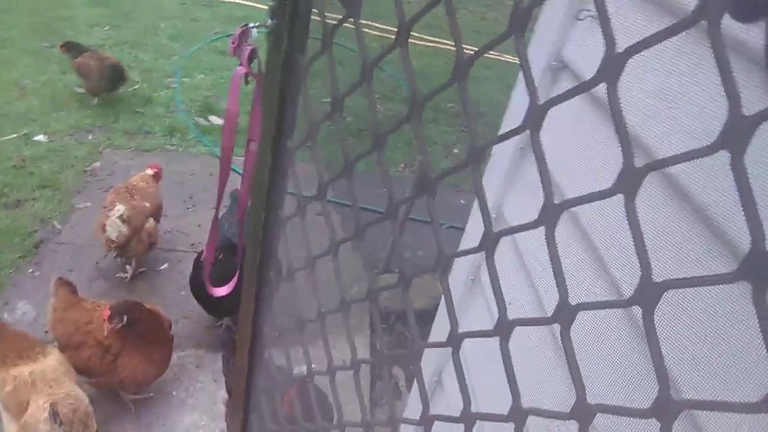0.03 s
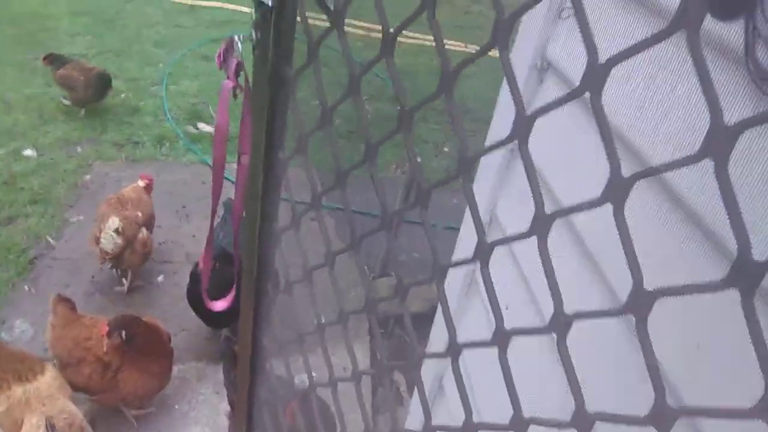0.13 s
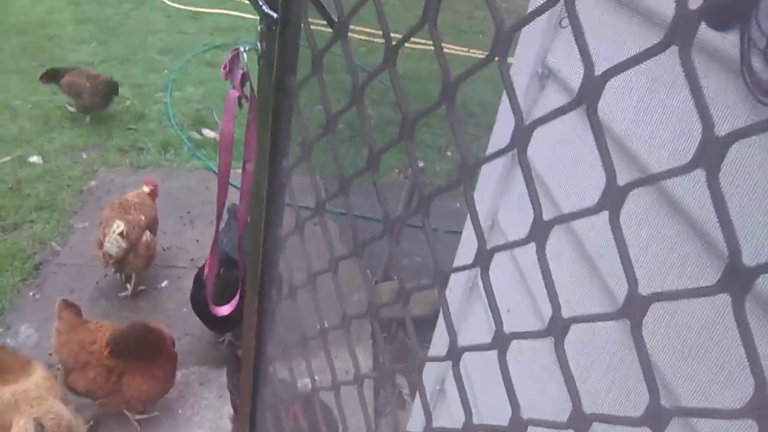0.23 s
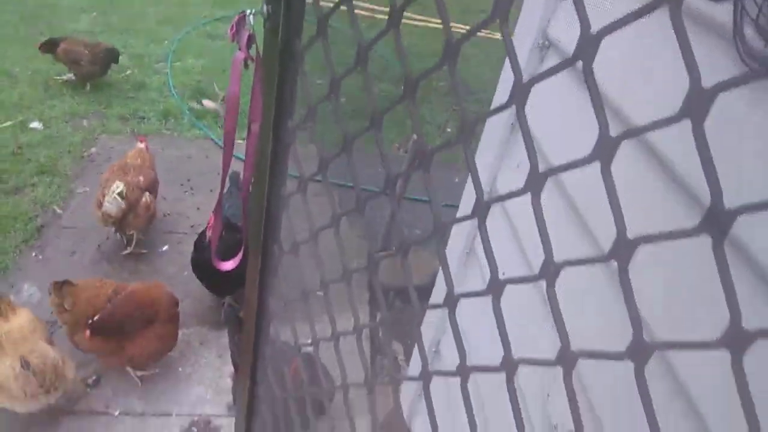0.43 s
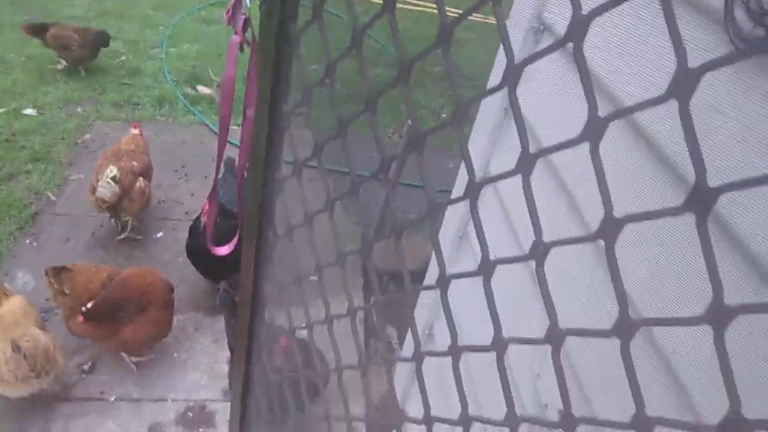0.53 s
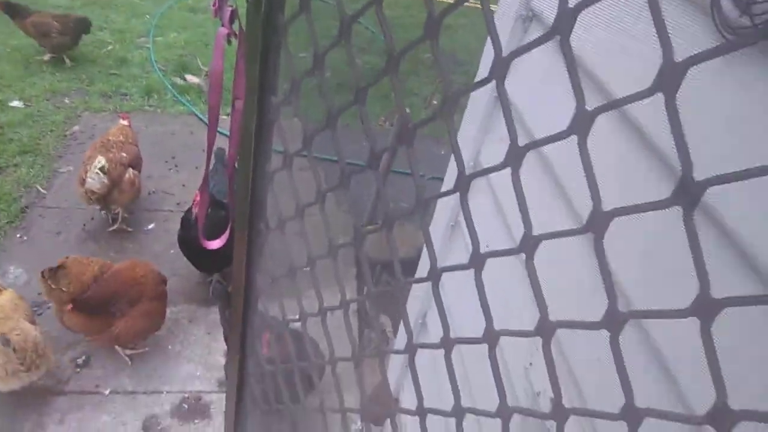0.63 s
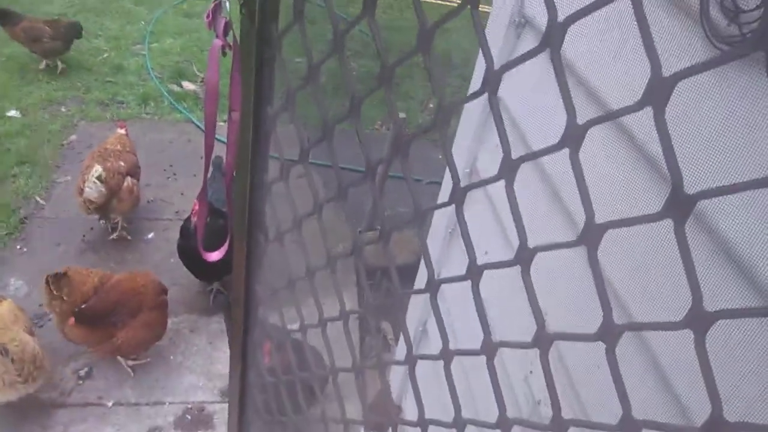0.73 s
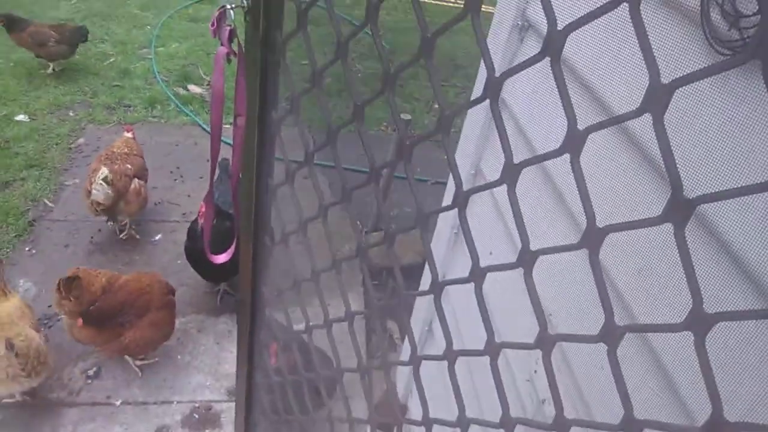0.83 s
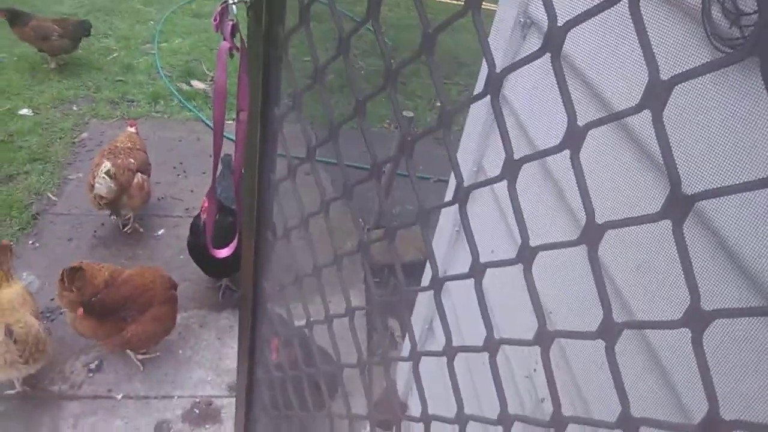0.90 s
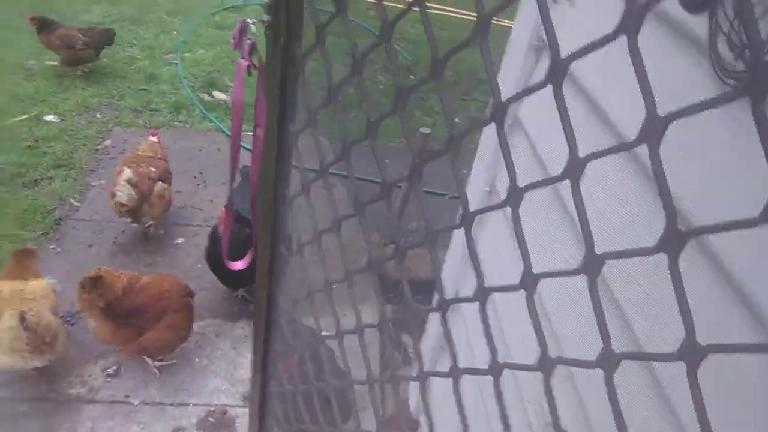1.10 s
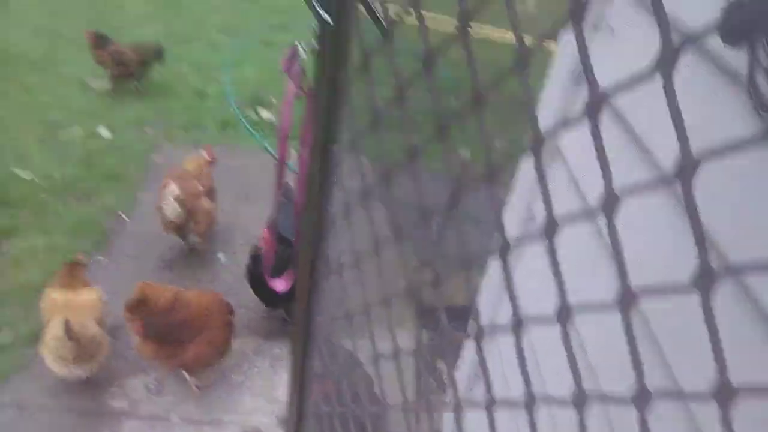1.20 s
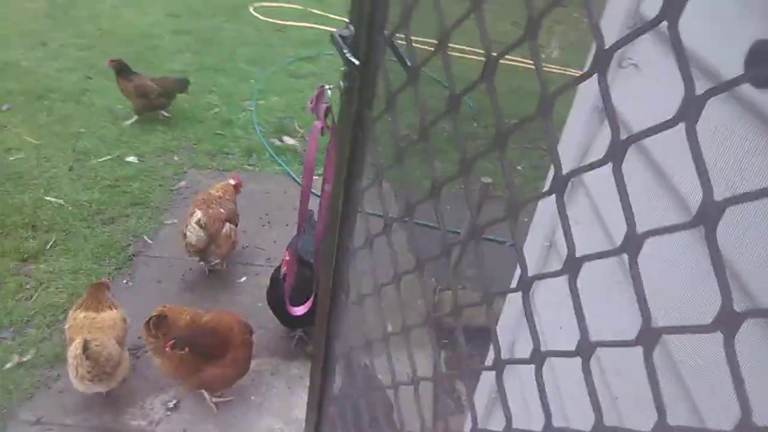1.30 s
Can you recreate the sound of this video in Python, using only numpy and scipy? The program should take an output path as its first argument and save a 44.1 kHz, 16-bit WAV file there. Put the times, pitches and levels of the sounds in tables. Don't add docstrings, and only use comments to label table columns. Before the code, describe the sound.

Chicken clucks, short and reedy, with loud dull door thuds and a latch click nearby.

```python
import sys
import numpy as np
from scipy import signal
from scipy.fft import rfft, irfft
from scipy.io import wavfile
from scipy.ndimage import uniform_filter1d

SR = 44100
rng = np.random.default_rng(int(sys.argv[2]) if len(sys.argv) > 2 else 0)


def decibels_to_gain(level_db):
    exponent = np.asarray(level_db, float) / 20
    return 10 ** exponent


def generate_wav(signal):
    frames = np.transpose(np.atleast_2d(signal))
    scaled = np.clip(frames, -1, 1) * 32767
    pcm = np.round(scaled).astype(np.int16)
    wavfile.write(sys.argv[1], SR, pcm)


N = 59535
T = np.arange(N) / SR
MIC_LOW_HZ = 115

# extra pitch at first as a share, time to lose it in s, attack in s.
GENTLE_ONSET = (0.11, .006, 0.002)


def colour(points, hz):
    p = np.array(points, float)
    return decibels_to_gain(np.interp(np.log(np.maximum(hz, 1)), np.log(p[:, 0]), p[:, 1]))


def walk(rate, size=N):
    k = int(SR / rate)
    w = rng.standard_normal(size + 4 * k)
    w = uniform_filter1d(uniform_filter1d(w, k), k)
    return w[:size] / w.std()


def lowpass(x, hz):
    return signal.sosfilt(signal.butter(2, np.clip(hz, 20, SR / 3), fs=SR, output="sos"), x)


def highpass(x, hz, order):
    return signal.sosfilt(signal.butter(order, hz, "high", fs=SR, output="sos"), x)


def bandpass(x, low_hz, high_hz, order):
    return signal.sosfilt(signal.butter(order, [low_hz, high_hz], "band", fs=SR, output="sos"), x)


def air():
    # pitch in Hz, level in dB.
    air_colour = [(30, -5.5), (470, -7), (1200, -9), (1700, -13), (3700, -21.5), (4200, -29), (8000, -31.5),
                  (14000, -32.5)]
    spectrum = rfft(rng.standard_normal(N)) * colour(air_colour, np.fft.rfftfreq(N, 1 / SR))
    noise = irfft(spectrum, N)
    level_db = -72 + 0.13 * walk(3.8)
    return decibels_to_gain(level_db) * noise / noise.std()


def scuffs():
    # peak in seconds, level in dB, rise in s, decay in s, centre in Hz.
    scrapes = [(0.019, -70, 0.028, 0.11, 7800), (0.076, -59.5, .012, 0.039, 5800),
               (0.101, -70.5, .008, 0.11, 5100), (.2385, -50.5, 0.00053, 0.0057, 4300),
               (0.261, -68, .01, 0.084, 4880), (0.409, -59, 0.0013, 0.0026, 5360),
               (0.4164, -59.5, 0.001, 0.005, 5300), (0.417, -73.5, .002, 0.053, 5400),
               (0.083, -68.5, 0.036, 0.04, 10200), (0.408, -73.5, 0.012, 0.044, 9700),
               (0.406, -58, 0.0041, 0.017, 1480), (0.774, -79, .001, 0.005, 4700),
               (1.006, -83, .002, 0.005, 5940), (0.58, -66, .015, .04, 1370),
               (0.54, -71.5, 0.025, 0.044, 1840), (0.921, -77, .02, 0.066, 5000)]
    out = 0
    for start, db, rise, decay, hz in scrapes:
        grit = rng.standard_normal(N) * decibels_to_gain(3.2 * walk(250))
        hiss = bandpass(grit, hz / 1.67, min(hz * 1.217, SR / 3), 2)
        log_shape = np.where(T < start, -((T - start) / rise) ** 2, (start - T) / decay)
        out = out + decibels_to_gain(db) * hiss / hiss.std() * np.exp(log_shape)
    return out


def strike(start, db, contact_ms, modes, scatter_db):
    u = np.arange(int(SR / 4)) / SR
    chance = rng.standard_normal((len(modes), 2))
    ring = 0
    for k, ((hz, mode_db, t60), (louder, sharper)) in enumerate(zip(modes, chance)):
        gain = (-1) ** k * decibels_to_gain(mode_db + scatter_db * louder)
        wave = np.sin(2 * np.pi * hz * (1 + 0.023 * sharper) * u)
        ring = ring + gain * wave * 1000. ** (-u / t60)
    push = np.sin(np.pi * np.clip(u[:600] * 1000 / contact_ms, 0, 1)) ** 2
    ring = signal.fftconvolve(ring, push)[:len(u)]
    out, i = np.zeros(N + len(u)), int(start * SR)
    out[i:i + len(u)] = ring * decibels_to_gain(db) / np.abs(ring).max()
    return out[:N]


def frame_sway():
    # start in seconds, level in dB, pitch in Hz, time to fade by 60 dB in s.
    sways = [
        (0.354, -46, 108, 0.13),
        (0.636, -66, 103.2, 0.23),
        (0.93, -58.5, 93.3, 0.28),
        (1.07, -62.5, 99, 0.22),
        (1.1, -64.5, 102, .12),
        (1.177, -68, 149.6, 0.3),
    ]
    sway = sum(strike(s, db, 2, [(hz, 0, t60)], 0) for s, db, hz, t60 in sways)
    return highpass(sway, MIC_LOW_HZ / 2, 2)


def frame_thuds():
    # start in seconds, level in dB, contact in ms, panel pitch in Hz.
    thuds = [(0.302, -40.5, 0.61, 330), (0.313, -38.5, 2.2, 200), (.328, -24, 1.25, 290),
             (0.34, -31.5, 2.4, 210), (0.348, -52, 0.73, 380), (.358, -33.5, 1.46, 190),
             (.381, -51, 2.3, 190), (0.393, -45.5, 1.5, 330), (0.4016, -21.5, 1.5, 313),
             (0.4045, -15, 1.38, 204), (0.4132, -17, 0.78, 340), (.422, -23.5, 1.2, 300),
             (.4335, -26.5, 1.04, 420), (.447, -39.5, 1.9, 410), (.460, -48, 1.1, 390),
             (.475, -38, 0.82, 430), (0.488, -40, 1.34, 380), (0.5161, -32, 1.62, 290),
             (0.5216, -31, 1.8, 270), (.545, -45, 1.1, 400), (0.561, -55, 2.9, 190), (.769, -38, 2.5, 230),
             (.778, -40, 2, 200), (0.7846, -38.5, 2.1, 260), (0.79, -40.5, 1.45, 400),
             (.7945, -35, 1.84, 169.4), (.801, -48.5, 0.94, 260)]
    # pitch in Hz, level in dB, time to fade by 60 dB in s.
    frame = [(101.6, -19, .07), (163.7, -9, .05), (186, -10, 0.043), (428.5, -13.5, .12),
             (546, -28.5, 0.036), (998, -23.5, 0.064)]
    panel_db, panel_t60_s = 4, 0.02
    return sum(strike(s, db, ms, [(hz, panel_db, panel_t60_s), *frame], 1) for s, db, ms, hz in thuds)


def latch():
    # pitch in Hz, level in dB, time to fade by 60 dB in s.
    latch_modes = [(200, -5.5, 0.056), (428, 0, 0.1), (542, -34.5, 0.11), (775, -14.5, 0.19),
                   (982, 0, 0.15), (1203, -7, 0.091), (1687, -1, .055), (1970, -5, 0.028),
                   (2390, -9.5, 0.038), (3320, -20, .03), (4640, -16, 0.015)]
    start_s, level_db = .2378, -25
    first = strike(start_s, level_db, 0.08, latch_modes, 0)
    return first + strike(start_s + 0.003466, level_db - 4, 0.18, latch_modes, 4.0)


def peck():
    # pitch in Hz, level in dB, time to fade by 60 dB in s.
    board_modes = [(290, 2.5, 0.027), (441, -10, 0.068), (685, -8.5, 0.083), (970, -13.5, 0.087),
                   (1178, -12, .043), (1697, -13.5, 0.12), (2100, -8, 0.024), (2254, -13.5, 0.029)]
    return strike(.9175, -29, 0.17, board_modes, 0)


def syrinx(hz, half_db, throat, breath_db):
    n, raspy = len(hz), breath_db > -42
    wobble, rasp_db = (.008, 2.8) if raspy else (0.0015, .5)
    phase = np.pi * np.cumsum(hz * (1 + wobble * walk(120, size=n))) / SR
    turn = 2 * np.pi * rng.random(15)
    tone = 0
    for k in range(1, 15):
        level = colour(throat, k * hz / 2) * (decibels_to_gain(half_db) if k % 2 else 1)
        flutter = decibels_to_gain(rasp_db * walk(450, size=n))
        tone = tone + np.sin(k * phase + turn[k]) * level * flutter
    breath = bandpass(rng.standard_normal(n), 2500, 7500, 3)
    return tone + decibels_to_gain(breath_db) * breath


RELEASE_S = .0055


def note(start, length, hz, db, half_db, throat, onset, breath_db=-34, swell_db=3):
    u = T[:SR // 10]
    drop, drop_s, attack = onset
    sag = 0.22 * np.clip(u - length, -length, length)
    pitch = hz * (1 + drop * np.exp(-u / drop_s) - sag)
    opening = np.sin(np.pi / 2 * np.clip(u / attack, 0, 1)) ** 2
    swell = decibels_to_gain(swell_db * (np.minimum(u / length, 1) - 1) - 3)
    shut = .5 - .5 * np.tanh((u - length) / RELEASE_S * 2)
    voice = decibels_to_gain(db) * np.sqrt(2) * opening * swell * shut * syrinx(pitch, half_db, throat, breath_db)
    return np.r_[np.zeros(max(int(start * SR), 0)), voice, np.zeros(N)][:N]


def far_murmurs():
    # start in seconds, length in s, pitch in Hz, level in dB.
    murmurs = [(.183, 0.011, 386, -66.5), (0.967, 0.045, 359.6, -66), (0.283, 0.052, 361.3, -62),
               (0.516, 0.026, 395, -63), (0.569, 0.016, 407.6, -57.5), (1.015, 0.013, 399, -69),
               (1.03, 0.016, 397, -73), (1.051, 0.014, 415, -72), (1.078, 0.017, 407, -76.5),
               (1.106, 0.023, 406, -76.5), (1.129, 0.017, 417, -76), (1.169, 0.018, 412, -77),
               (1.189, 0.022, 363.4, -73), (1.209, 0.021, 387, -78), (1.232, 0.0094, 398, -79),
               (1.256, 0.021, 331.6, -77.5)]
    # pitch in Hz, level in dB.
    far_throat = [(400, -29), (800, -14.5), (1200, 12), (1620, -16.5), (2100, -6), (3000, -32)]
    return sum(note(*row, -19, far_throat, GENTLE_ONSET) for row in murmurs)


def fading_notes():
    # start in seconds, length in s, pitch in Hz, level in dB.
    fading = [
        (0, 0.026, 681.5, -55),
        (.034, 0.02, 659, -61.5),
        (0.655, 0.033, 709, -59),
    ]
    # pitch in Hz, level in dB.
    dull_throat = [(680, -4), (1360, -10), (2050, -31)]
    return sum(note(*row, -29, dull_throat, (0, 1, .001)) for row in fading)


def held_notes():
    # start in seconds, length in s, pitch in Hz, level in dB, half-pitch lines in dB.
    held = [
        (0.22, 0.019, 702, -53, -19),
        (0.255, 0.046, 708, -46, -8.5),
    ]
    # pitch in Hz, level in dB.
    held_throat = [(350, -5), (720, -6), (1080, -6.5), (1440, 3.5), (2150, -11.5), (2700, -27), (3900, -49),
                   (4270, -24), (4600, -44)]
    return sum(note(*row, held_throat, GENTLE_ONSET) for row in held)


def drawn_out_call():
    # time in seconds, pitch in Hz, level in dB, half-pitch lines in dB.
    call_path = [
        (0.545, 751, -53, -4),
        (0.565, 741, -50.5, -13),
        (.576, 798, -51.5, -5),
        (0.59, 992, -46.5, -14.5),
        (.600, 775, -47, -19.5),
        (0.615, 730, -51.5, -13),
        (.636, 710.3, -48, 3.5),
        (0.648, 711, -50.5, 4.5),
        (0.656, 694, -64, 1),
    ]
    # pitch in Hz, level in dB.
    call_throat = [(340, -16.5), (740, -2), (920, -6), (1420, 1.5), (2200, -7), (2600, -36.5), (3600, -59),
                   (3900, -19), (4200, -49)]
    time, hz, db, half_db = np.array(call_path, float).T
    fade = np.clip(np.minimum(T - time[0], time[-1] - T) / RELEASE_S, 0, 1)
    voice = syrinx(np.interp(T, time, hz), np.interp(T, time, half_db), call_throat, -25.5)
    return fade * decibels_to_gain(np.interp(T, time, db)) * voice


def soft_clucks():
    # start in seconds, length in s, pitch in Hz, level in dB, half-pitch lines in dB.
    soft = [
        (0.196, .022, 679, -52, -32),
        (0.485, .03, 670, -53.5, -24),
        (0.5303, 0.013, 717, -52.5, -25),
    ]
    # pitch in Hz, level in dB.
    soft_throat = [(340, -14), (700, 0.5), (850, -2), (1050, -8), (1400, 1), (1900, 0), (2200, -14),
                   (2700, -36)]
    soft_onset = (.55, .007, .004)
    return sum(note(*row, soft_throat, soft_onset) for row in soft)


def loud_clucks():
    # start in seconds, length in s, pitch in Hz, level in dB, half-pitch lines in dB.
    clucks = [
        (0.139, 0.027, 670.6, -39, -53),
        (0.839, 0.026, 635.4, -30.5, -58.5),
    ]
    replies = [
        (.888, .029, 659, -36, -39.5, -0.5),
        (0.933, 0.03, 682.6, -28, -29, 7.5),
    ]
    # pitch in Hz, level in dB.
    near_throat = [(330, -27), (690, -15.5), (1000, 6.5), (1330, 4.5), (2050, -28.5), (3300, -67.5),
                   (3870, -35.5), (4600, -41)]
    # pitch in Hz, level in dB.
    shut_top = [(3300, -62), (4600, -69)]
    loud_onset = (0.46, .004, 0.012)
    breath_db = -44
    shut_throat = [*near_throat[:-3], *shut_top]
    out = sum(note(*row, near_throat, loud_onset, breath_db, 6.5) for row in clucks)
    return out + sum(note(*row, shut_throat, loud_onset, breath_db, swell) for *row, swell in replies)


def fence_echo(birds):
    lag = int(.044 * SR)
    copies = 0
    for delay, db in ((lag // 3, 6), (lag, 0), (2 * lag - 400, -5)):
        copies = copies + np.r_[np.zeros(delay), birds[:-delay]] * decibels_to_gain(db)
    return decibels_to_gain(-12) * lowpass(lowpass(copies, 800), 800)


def yard_tail(birds, knocks):
    u = T[:SR // 2]
    t60_s, build_up_s = 0.27, 0.0077
    tail = lowpass(rng.standard_normal(len(u)), 2700) * 1000. ** (-u / t60_s)
    tail = tail * np.minimum(u / build_up_s, 1)
    wet = signal.fftconvolve(decibels_to_gain(-6.5) * birds + decibels_to_gain(4) * knocks, tail / np.sqrt(np.sum(tail ** 2)))[:N]
    return decibels_to_gain(-25) * wet


def scene():
    knocks = highpass(frame_thuds() + latch() + peck(), MIC_LOW_HZ, 4) + frame_sway()
    birds = far_murmurs() + fading_notes() + held_notes() + drawn_out_call() + soft_clucks() + loud_clucks()
    echoes = fence_echo(birds) + yard_tail(birds, knocks)
    return (birds + knocks + echoes + scuffs() + air())[None]


def roll_off(x):
    return signal.sosfilt(signal.butter(12, 14350, fs=SR, output="sos"), x)


def record(dry):
    return roll_off(dry)


dry = scene()
out = record(dry)
generate_wav(out)
```